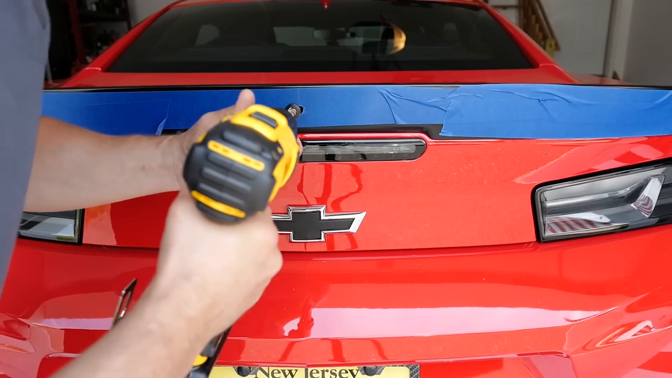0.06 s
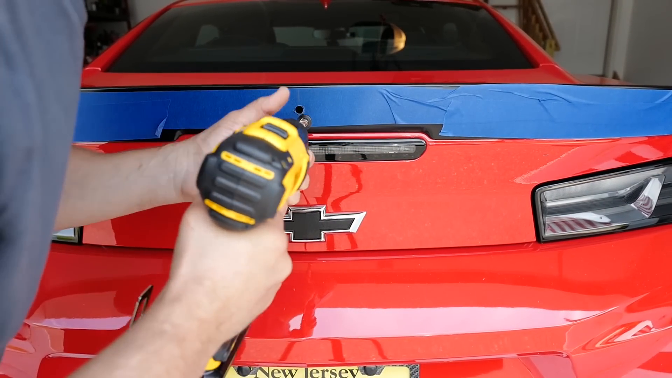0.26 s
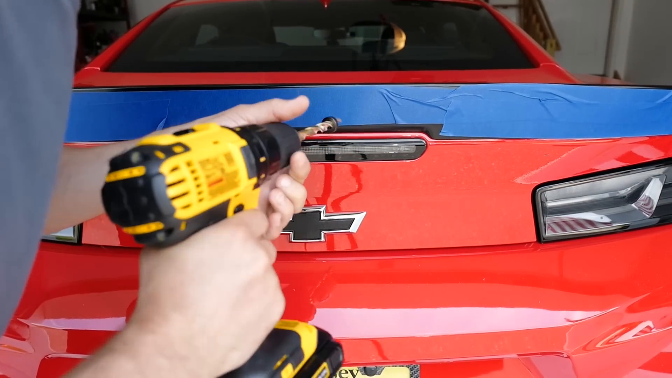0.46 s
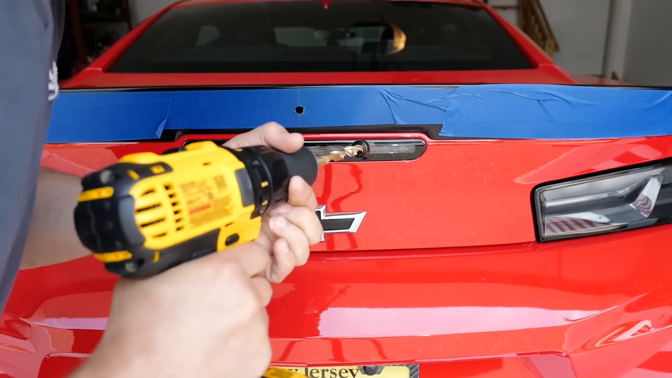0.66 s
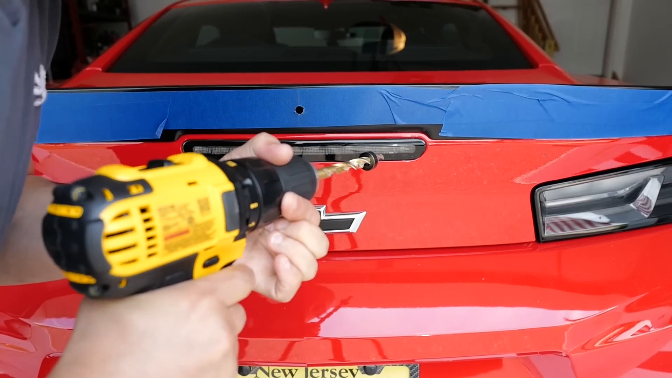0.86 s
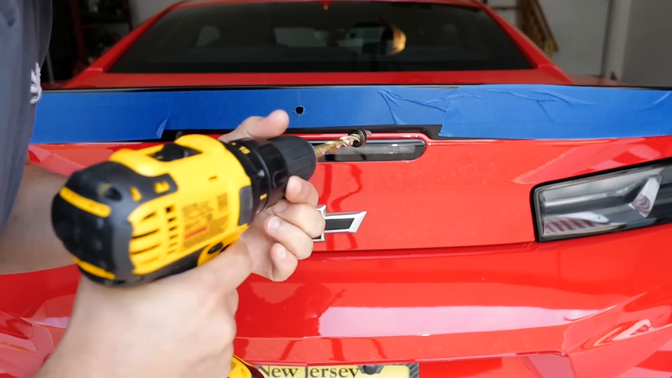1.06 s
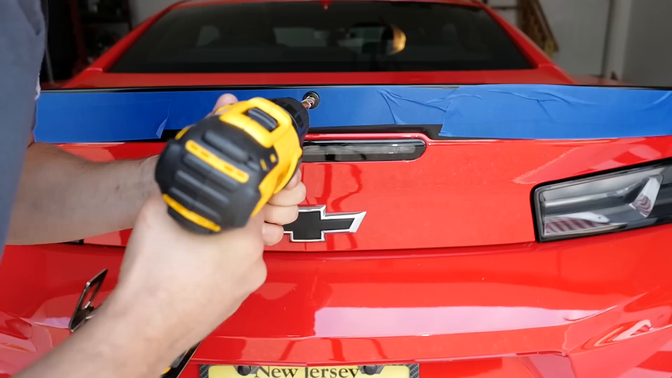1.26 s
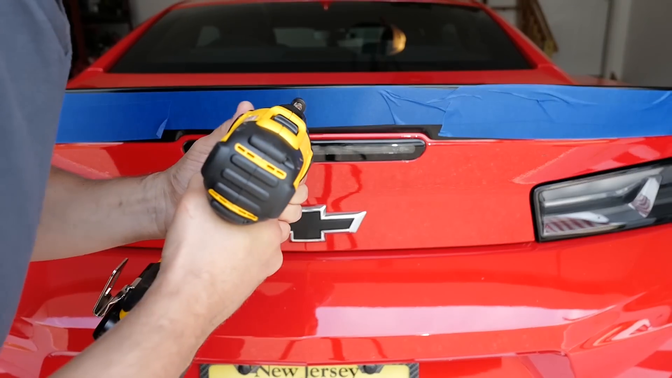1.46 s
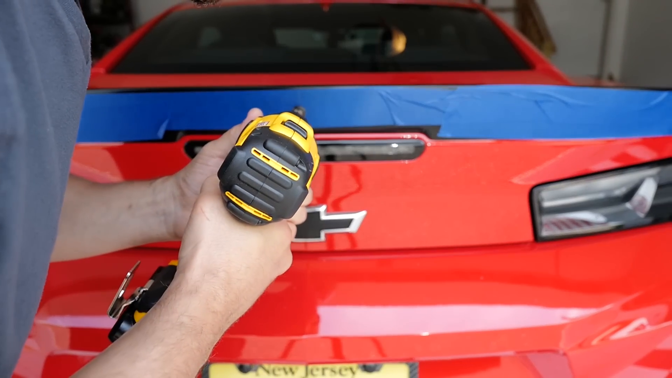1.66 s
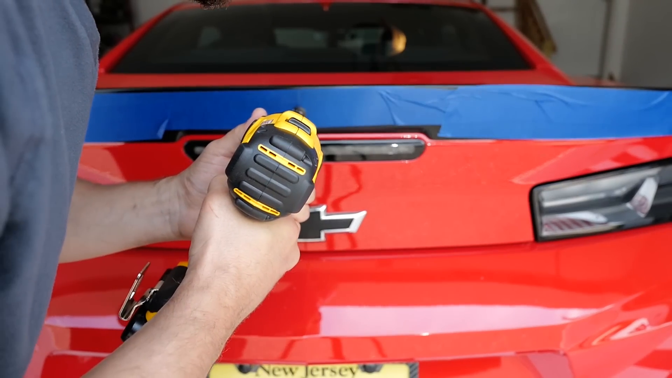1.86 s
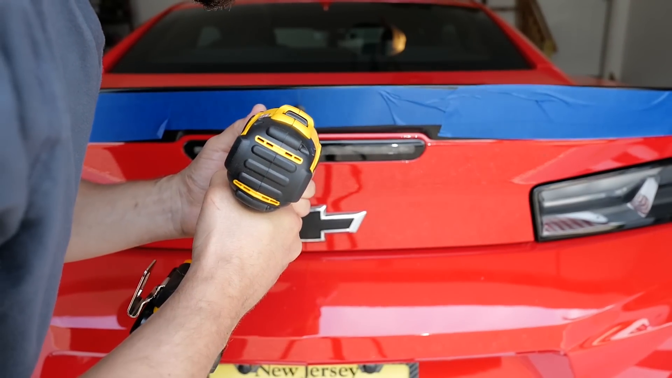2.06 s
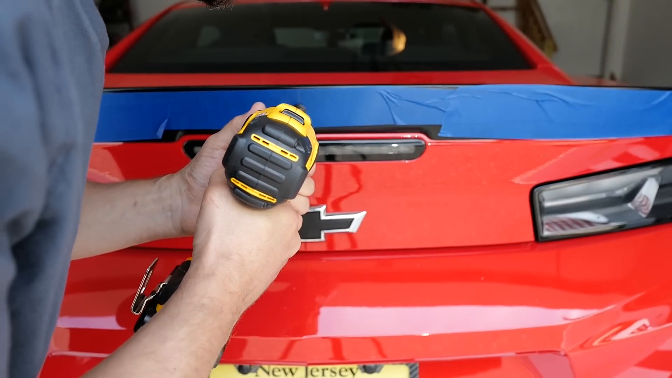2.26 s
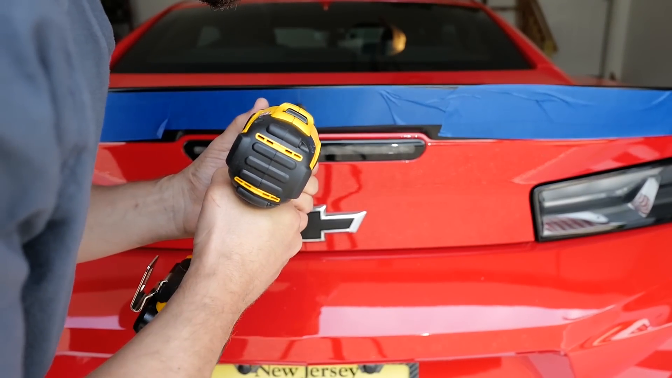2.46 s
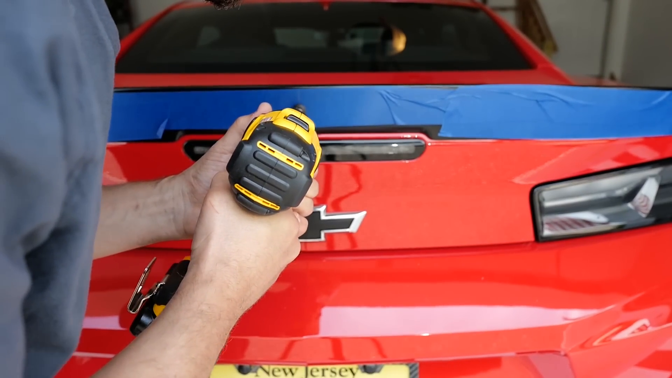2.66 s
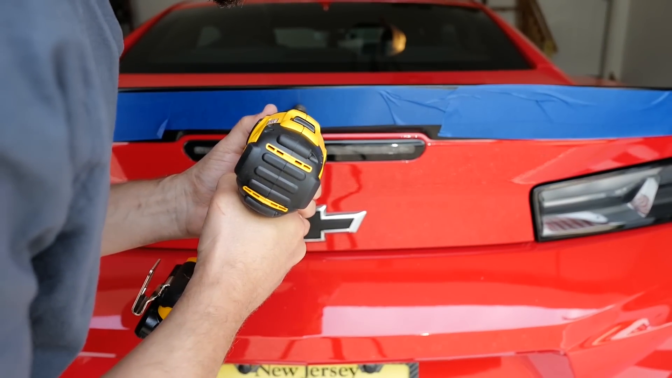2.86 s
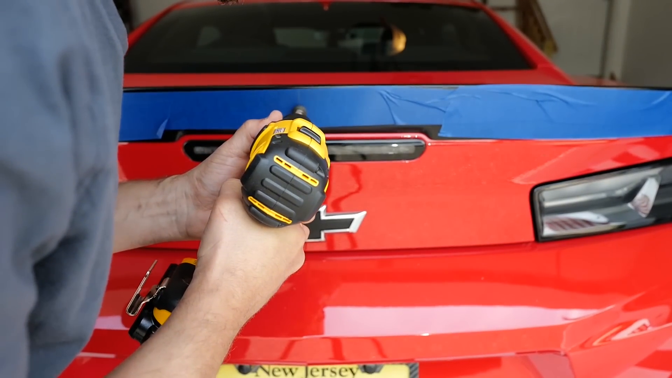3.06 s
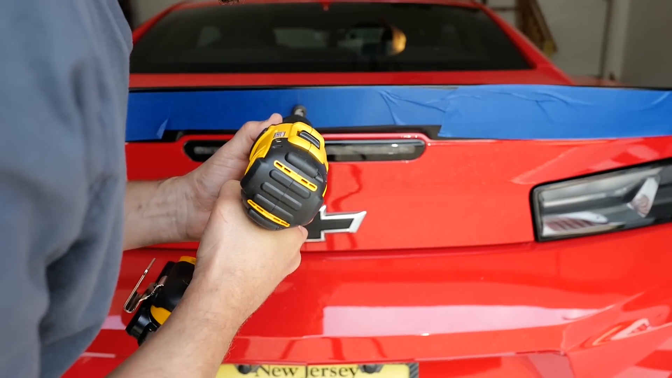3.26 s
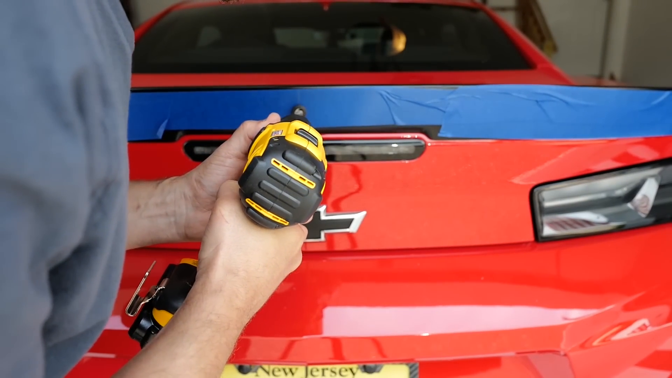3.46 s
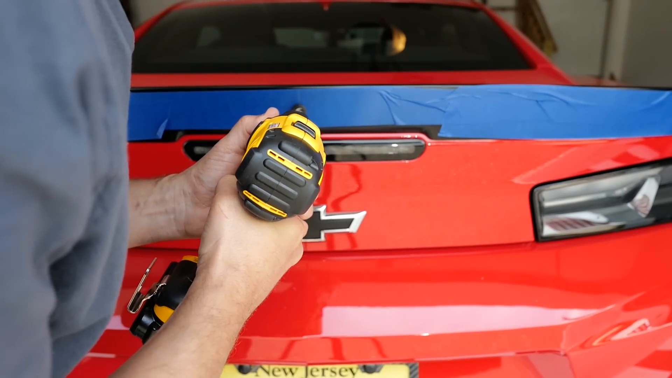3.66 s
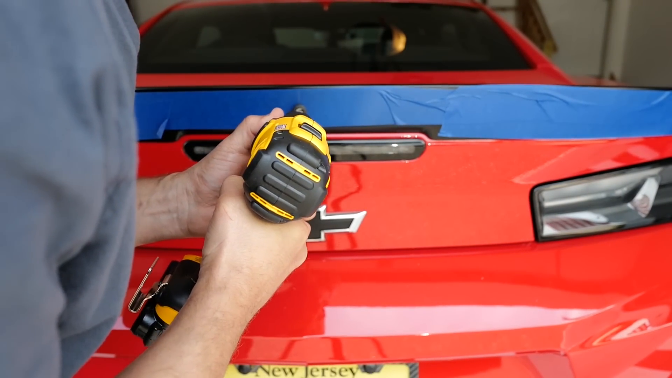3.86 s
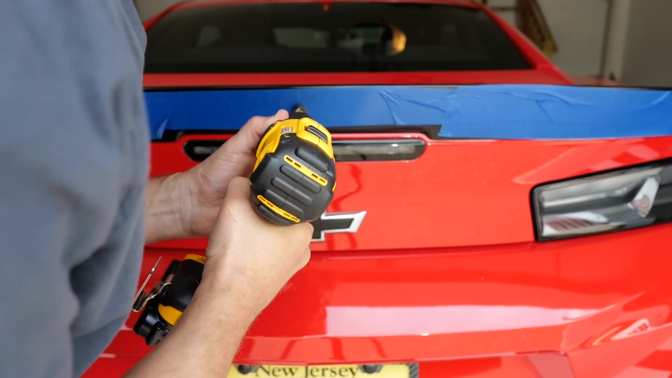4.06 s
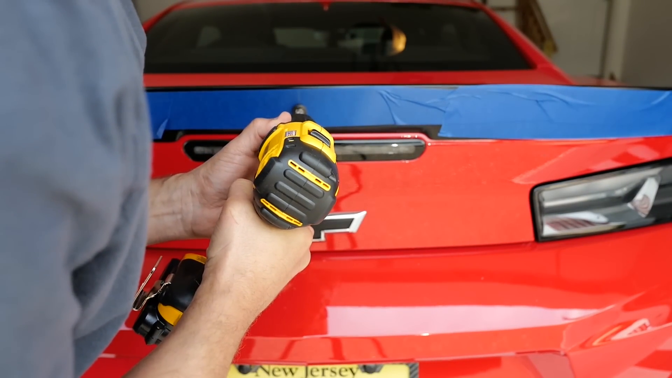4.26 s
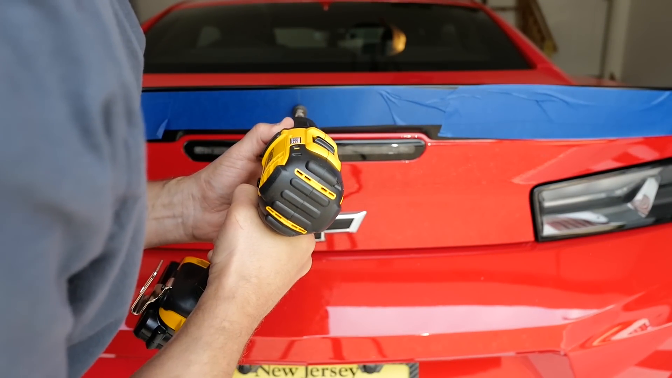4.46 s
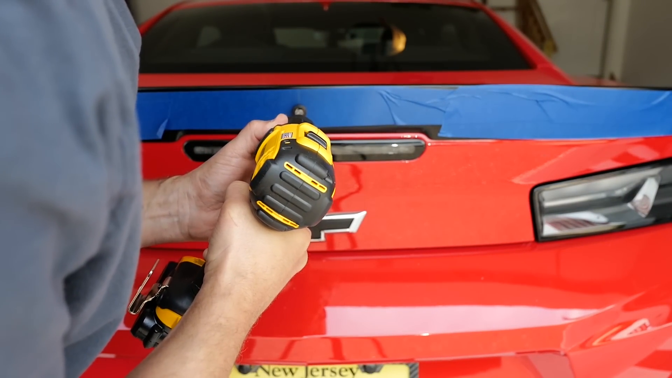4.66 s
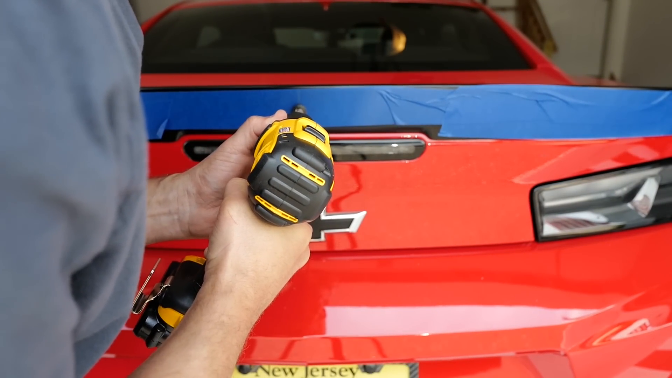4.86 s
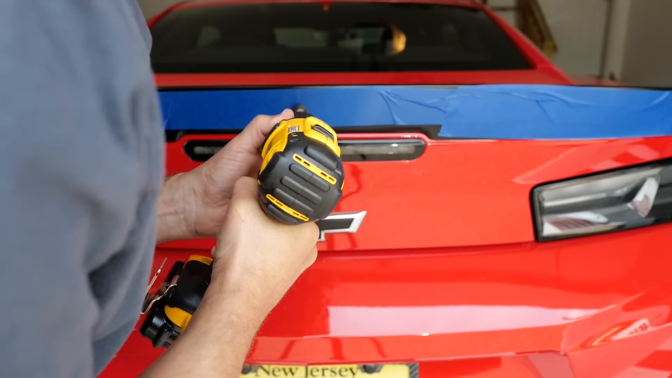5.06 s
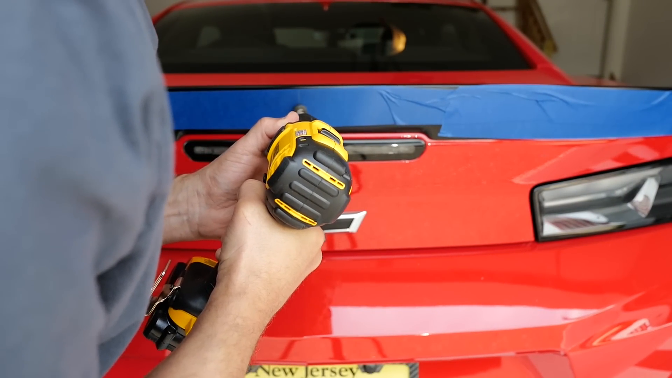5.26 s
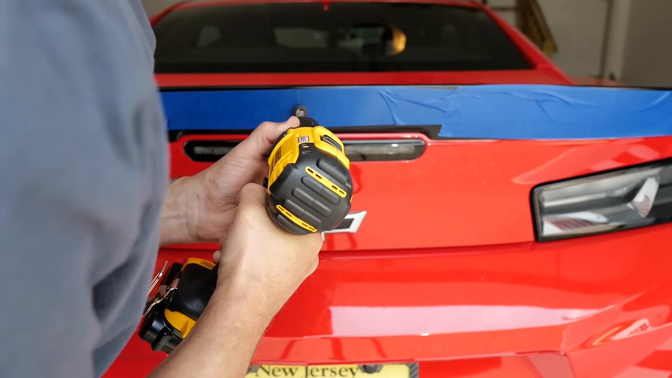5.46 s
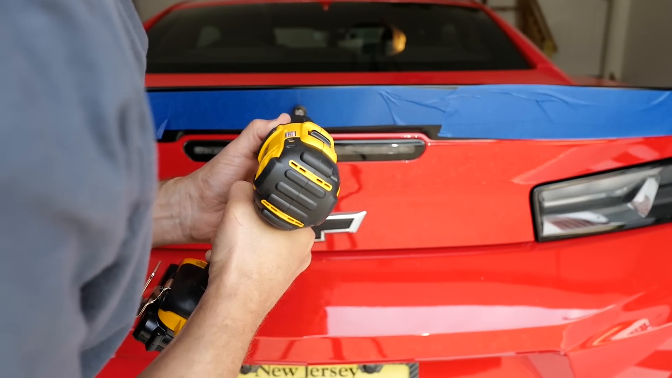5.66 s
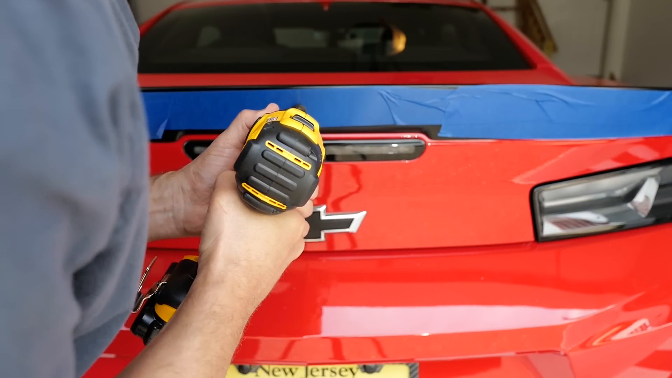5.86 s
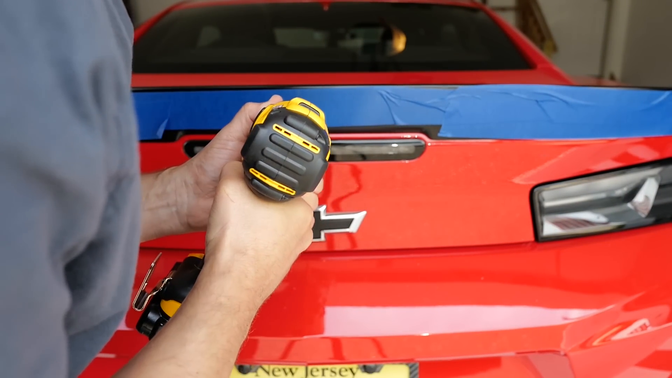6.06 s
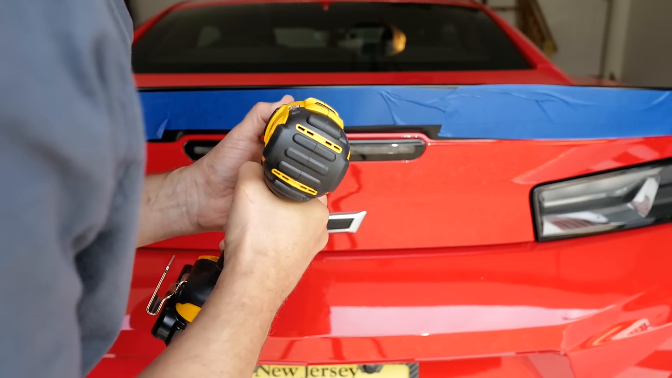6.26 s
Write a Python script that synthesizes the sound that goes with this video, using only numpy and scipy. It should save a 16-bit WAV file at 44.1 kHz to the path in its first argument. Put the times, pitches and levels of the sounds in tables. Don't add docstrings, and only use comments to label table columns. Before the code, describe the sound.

A faint steel squeak and skin rustling open the scene, followed by a sharp knock and a cluster of chuck rattles. Light scraping on sheet metal leads to a buzzy electronic trigger whine and a rapid motor rise. The bright, gritty drill whirr drops and roughens twice under load, springing back to full speed each time. Heard close in a small hard-walled garage, on a thin-sounding camera microphone with two ports.

```python
import sys
import numpy as np
from scipy import signal
from scipy.fft import rfft, irfft, next_fast_len
from scipy.io import wavfile
from scipy.ndimage import uniform_filter1d

SR = 44100
rng = np.random.default_rng(int(sys.argv[2]) if len(sys.argv) > 2 else 0)


def generate_wav(signal):
    frames = np.transpose(np.atleast_2d(signal))
    scaled = np.clip(frames, -1, 1) * 32767
    pcm = np.round(scaled).astype(np.int16)
    wavfile.write(sys.argv[1], SR, pcm)


def gain_from_db(level_db):
    decades = np.asarray(level_db, float) / 20
    return 10 ** decades


N = 278271
T = np.arange(N) / SR

# f/Hz, level per Hz/dB
GARAGE = [(18, -71), (30, -26.5), (198, -11), (293, -15.5), (380, -17.5), (430, -27.5), (578, -24.5),
          (751, -23.5), (1340, -28), (1690, -30), (2780, -34), (3300, -36.5), (8000, -42), (15700, -47)]
# f/Hz, width/Hz, level/dB
HUM_MODES = [(114.7, 13, -67), (166.5, 3.3, -61.5), (205.3, 9, -57.5), (232.7, 8.7, -63.5)]
GARAGE_DB = -53

# dull rub level/dB, chuck rasp level/dB, skin hiss level/dB, graininess/dB
GRIP, CHUCK, PALM, STEEL, LID = (-0.5, -7, -16, 0.5), (1, 1.5, -23, 3.5), (-9, -13, -1, 1.5), (-12, 0, -16, 4), (0.5, -26, -19.5, 5.5)
# loudest t/s, swell/s, fade/s, level/dB, surface
STROKES = [(.05, .2, .3, -62, STEEL), (.4, 0.12, .09, -66, PALM), (.615, 0.12, 0.047, -52.5, PALM),
           (.66, .1, .14, -64, GRIP), (.79, 0.088, 0.033, -49, STEEL), (.88, .2, .1, -65, GRIP),
           (1.045, 0.17, 0.097, -44.5, CHUCK), (1.165, 0.073, .05, -54.5, GRIP),
           (1.17, .06, .045, -54, PALM), (1.3, 0.26, 0.5, -55.5, GRIP), (2.04, 0.085, 0.23, -52, LID),
           (2.142, 0.045, 0.088, -43, LID), (2.24, .2, 0.047, -53.5, LID)]
# rub level/dB, rasp level/dB, hiss level/dB
RESTING = (-86, -88, -78)
STROKE_DROP_DB, STROKE_CURVE = 22.5, 1.4
# f/Hz, width/Hz, level/dB
BODY_MODES = [(714, 95, -9), (880, 100, 7), (980, 96, -13), (1390, 400, 2), (1890, 260, 0), (2230, 112, 2),
              (2810, 60, -3)]
# f/Hz, width/Hz, level/dB
CHUCK_MODES = [(3250, 60, -1), (3660, 96, -8), (3820, 72, -4), (4190, 400, 1), (4660, 110, -1),
               (5050, 130, -10), (5530, 160, -5)]
# f/Hz, width/Hz, level/dB
LID_MODES = [(380, 66, -5), (720, 53, -1), (1030, 160, -0.5), (1590, 50, -13), (1946, 75, -0.5),
             (2190, 80, -11), (2830, 50, -17)]
ON_LID_S, TRIGGER_S = 1.97, 2.3

# t/s, peak level/dB, ring f/Hz, crack minus peak level/dB
KNOCKS = [(.036, -37, 3520, -14), (0.536, -43, 1450, -13), (.675, -43, 853, -16), (.712, -41, 4300, -11),
          (.718, -43, 2500, -9), (0.7693, -20.5, 880, -15), (.92, -42, 1250, -10), (0.951, -34, 1996, -15),
          (0.965, -40, 1190, -6), (.978, -39, 1850, -8.5), (0.995, -31, 1220, -21), (1.017, -32, 1330, -19),
          (1.026, -32, 1020, -18), (1.046, -30, 2240, -21), (1.075, -35, 1260, -14), (1.123, -37, 917, -6),
          (1.389, -37.5, 1350, -20), (1.554, -43.5, 830, -25), (2.003, -38.5, 940, -25),
          (2.124, -37.5, 990, -22), (2.144, -47, 2010, -14), (2.226, -41, 931, -22), (2.298, -39, 8100, -8)]
# t/s, peak level/dB, ring f/Hz, crack minus peak level/dB
BUMPS = [
    (.144, -46, 790, -29),
    (.722, -33, 1500, -9),
    (0.762, -35, 4600, -20),
    (.784, -40, 2550, -13),
    (1.142, -34.5, 5530, -1),
    (1.143, -29, 1850, -15),
    (1.202, -40, 3800, -5),
]
KNOCK_RISE_S, BUMP_RISE_S = 0.00042, 0.0032
RING_S, RING_SLOPE = 0.0078, .0012

# t/s, level/dB
SQUEAK = [
    (0, -64),
    (.05, -70),
    (.1, -74),
    (.14, -65),
    (.2, -69),
    (.27, -70),
    (.31, -85),
]
# f/Hz, width/Hz, level/dB
SQUEAK_MODES = [(3190, 150, -5), (3570, 150, -5), (3910, 70, 7), (4580, 200, -10)]

# t/s, level/dB
CHOPPER = [
    (2.296, -85),
    (2.298, -40.5),
    (2.325, -35.5),
    (2.35, -39),
    (2.39, -31),
    (2.42, -80),
]
# f/Hz, level/dB
CHOPPER_TONES = [(3935, -4.5), (7880, -3), (11800, -12), (15720, -19)]

# t/s, speed the shaft heads for f/Hz, lag/s
DRIVE = [(2.27, 1469, 1.26), (2.388, 941, .357), (2.481, 411.2, .078), (2.85, 410, .1), (3.28, 407.2, .02),
         (3.34, 409.3, .2), (3.464, 301.3, .231), (4.063, 317, .288), (4.126, 406.2, .075),
         (4.544, 266.2, .296), (5.179, 292, .136), (5.261, 406.5, .084), (5.5, 405.8, .1), (6.0, 404.8, .2)]
FREE_HZ, BOGGED_HZ = 400, 335
RUN_IN_S = 2.52
SURGE_HZ_PER_S, SURGE_S = 500, .025
SURGE_GRIND_DB, SURGE_BARS_DB, SURGE_AIR_DB = 3, 1, 1

FAN_BLADES, BARS = 19, 10
# shaft f/Hz, level/dB
FAN_VOICE = [(100, -49), (170, -25.5), (285, -25.5), (322, -31.5), (345, -23), (363, -33.5), (385, -22),
             (410, -23.5)]
# shaft f/Hz, level/dB
BARS_VOICE = [(100, -70), (205, -23.5), (252, -18.5), (272, -40), (338, -42), (350, -34), (380, -27.5),
              (410, -30)]
# t/s, change of fan tone level/dB, change of brush tone level/dB
TONE_SWELLS = [(2.47, 0.5, 2), (2.52, -9, 9.5), (2.58, 2.5, -4), (2.75, -0.5, -4.5), (3.0, 1.5, -0.5),
               (3.2, 3, -2.5), (3.55, -0.5, 0), (3.9, -5, 3), (4.2, 0, 1), (4.45, 0.5, -4.5), (4.6, -3, 1.5),
               (5.0, 1.5, -2), (5.33, 1, -1), (5.4, -2.5, 1.5), (5.65, -1.5, 0.5), (6.0, -5.5, 1.5),
               (6.15, -2, 1.5), (6.3, 2, 3.5)]
ROTOR_ORDERS = [4, 6, 7, 8, 9, 11, 12, 13, 14, 16, 17, 18, 20, 21, 22, 24, 26, 28, 29, 30, 31, 33, 36, 40]
# running free level/dB, bogged down level/dB
ROTOR = [(-41, -44), (-47, -43), (-44, -40), (-42, -40), (-40, -44), (-43, -38.5), (-39, -38.5), (-41, -48),
         (-38, -47), (-39, -40), (-42, -39), (-37, -44), (-37, -37), (-36, -43), (-45, -47), (-44, -49),
         (-46, -49), (-45, -48), (-44, -47), (-38, -43), (-50, -45), (-51, -46), (-47, -48), (-50, -40)]
# f/Hz, level/dB
UNBALANCE = [(200, -69), (260, -44), (290, -44), (325, -45.5), (365, -47.5), (405, -43), (480, -52),
             (570, -52), (700, -46.5), (800, -55), (900, -57.5), (1100, -47), (1230, -46)]
# f/Hz, level per Hz/dB
SHELL = [(90, -27), (250, -14), (400, -9.5), (530, -24.5), (750, -12), (1100, -7), (1700, -4), (3300, -3.5),
         (6000, -0.5), (7000, -0.5), (9500, -2), (11000, -5), (14000, -4.5), (16000, -9)]
# f/Hz, width/Hz, level/dB
SHELL_MODES = [(1316, 170, 4), (2060, 480, 5.5), (2800, 200, 4), (3530, 400, 2.5), (4760, 250, 0.5),
               (6600, 1040, -5), (8460, 2800, 2.5), (10600, 980, -0.5), (12000, 1100, 3)]
MESH, GEARING = 7.2, 24.8
GRIND_DB, GRIND_FROM_HZ, GRIND_RISE_DB = -28.5, 220, 27
AIR_FROM_HZ = 7100
AIR_DB, AIR_RISE_DB = 1, 31.5

# f/Hz, level/dB
WALLS = [(30, 4), (150, 7), (300, -5.5), (600, -0.5), (1200, -1.5), (2500, -4), (5000, 3), (8000, -1.5),
         (15000, 3.5)]
ROOM_T60_S, ROOM_DB = 0.13, -13.5
# f/Hz, left minus right level/dB
LEFT_MINUS_RIGHT = [(60, 0.0), (110, -1), (200, 3.5), (380, -2.5), (700, -1), (1290, -1.5), (2380, 2),
                    (4400, 1.5), (8120, 2), (15000, -2)]
# f/Hz, level/dB
MIC = [(20, -17), (50, -14), (80, -2), (430, -1), (510, -8.5), (600, -0.5), (16000, -0.5)]


def level(x, db=0):
    return x * gain_from_db(db) / np.sqrt(np.mean(x ** 2))


def shape(table, hz):
    f, db = np.transpose(table)
    return np.interp(np.log(np.maximum(hz, 1)), np.log(f), db)


def colour(x, gain):
    size = next_fast_len(N)
    return irfft(rfft(x, size) * gain(np.fft.rfftfreq(size, 1 / SR)), size)[:N]


def peak(f, hz, width):
    return 1 / (1 + (2 * (f - hz) / width) ** 2)


def band(lo_hz, hi_hz, x=None):
    x = rng.standard_normal(N) if x is None else x
    return level(colour(x, lambda f: 1 / (1 + (lo_hz / (f + 1)) ** 4) / (1 + (f / hi_hz) ** 4)))


def ring(x, modes):
    return level(colour(x, lambda f: sum(gain_from_db(db) * peak(f, hz, width) for hz, width, db in modes)))


def walk(rate):
    steps = np.repeat(rng.standard_normal(int(rate * T[-1]) + 2), repeats=8)
    steps = level(uniform_filter1d(uniform_filter1d(steps, size=8), size=8))
    return np.interp(T * rate * 8, np.arange(len(steps)), steps)


def curves(table):
    s, *columns = np.transpose(table)
    return [np.interp(T, s, c) for c in columns]


def garage():
    mid, side = rng.standard_normal((2, N))

    def side_gain(f):
        return gain_from_db(shape(GARAGE, f)) * (np.clip(f / 900, .22, .85) + .15 * (f < 70))

    common = colour(mid, lambda f: gain_from_db(shape(GARAGE, f)))
    scale = gain_from_db(GARAGE_DB - 3.5) / common.std()
    common = common * scale * gain_from_db(1.0 * walk(3.5))
    differing = colour(side, side_gain) * scale
    hum = 0
    for hz, width, db in HUM_MODES:
        hum = hum + level(colour(rng.standard_normal(N), lambda f: peak(f, hz, width)), db)
    return common + hum + differing * np.array([[1], [-1]])


def strokes():
    t = np.arange(0, TRIGGER_S, .001)
    power, grain = gain_from_db(np.outer(RESTING, np.ones(len(t)))) ** 2, 0
    for s, swell, fade, db, (*mix_db, grain_db) in STROKES:
        distance = np.where(t < s, (s - t) / swell, (t - s) / fade)
        shape_db = db - STROKE_DROP_DB * distance ** STROKE_CURVE
        power = power + gain_from_db(np.add.outer(mix_db, shape_db)) ** 2
        grain = grain + grain_db * gain_from_db(shape_db + max(mix_db)) ** 2
    return curves(np.transpose([t, *(10 * np.log10(power)), grain / power.max(axis=0)]))


def hands():
    dull_db, rasp_db, hiss_db, grain_db = strokes()
    grains = gain_from_db(grain_db * np.clip(walk(500), -2, 1.6) - 0.15 * grain_db ** 2)
    slip = rng.standard_normal(N) * grains
    on_body = ring(slip, BODY_MODES) + 0.57 * band(620, 3000, slip)
    dull = np.where(T < ON_LID_S, on_body, ring(slip, LID_MODES)) * gain_from_db(dull_db - 3)
    rasp = (ring(slip, CHUCK_MODES) + 0.77 * band(3400, 7500, slip)) * gain_from_db(rasp_db - 8.5)
    hiss = band(6200, 13000, slip) * gain_from_db(hiss_db)
    return (dull + rasp + hiss) * (T < TRIGGER_S)


def knocks():
    out, t = np.zeros(N), T[:SR // 8]
    thud, crack = band(390, 2640), band(2200, 10000)
    hits = [(*k, KNOCK_RISE_S) for k in KNOCKS] + [(*k, BUMP_RISE_S) for k in BUMPS]
    for s, peak_db, hz, crack_db, rise in hits:
        i = int(s * SR)
        here = slice(i, i + len(t))
        t60 = RING_S - RING_SLOPE * crack_db
        after = np.maximum(t - rise, 0)
        tone = 0.51 * np.sin(2 * np.pi * hz * t)
        tone += .15 * (hz < 3000) * np.sin(2 * np.pi * 2.0 * hz * t)
        hit = (tone + 0.3 * thud[here]) * np.exp(-np.log(1000) * after / t60)
        hit += gain_from_db(crack_db) * crack[here] * np.exp(-after / 0.0021)
        out[here] += gain_from_db(peak_db) * hit * np.minimum(t / rise, 1)
    return colour(out, lambda f: 1 / (1 + (520 / (f + 1)) ** 6))


def bit():
    sing = ring(rng.standard_normal(N), SQUEAK_MODES)
    return sing * gain_from_db(curves(SQUEAK)[0] + 4 + 3 * walk(40)) * (T < SQUEAK[-1][0])


def chopper():
    whine = sum(gain_from_db(db + 4.6 * walk(99)) * np.sin(2 * np.pi * hz * T) for hz, db in CHOPPER_TONES)
    return whine * gain_from_db(curves(CHOPPER)[0]) * (T > CHOPPER[0][0]) * (T < CHOPPER[-1][0])


def shaft():
    start, goal, lag = np.transpose(DRIVE)
    row = np.maximum(np.searchsorted(start, T) - 1, 0)
    lapse = np.cumsum((T > start[0]) / lag[row]) / SR
    hz = np.exp(-lapse) * np.cumsum(np.diff(np.exp(lapse), prepend=1) * goal[row])
    surge = np.clip(np.gradient(hz) * SR / SURGE_HZ_PER_S, 0, 1)
    smooth = 1 / (SURGE_S * SR)
    return np.maximum(hz, 1), signal.lfilter([smooth], [1, smooth - 1], surge)


def shell_db(hz):
    return shape(SHELL, hz) + sum(db * peak(hz, f, width) for f, width, db in SHELL_MODES)


def shell_at(hz):
    grid = np.arange(0, SR / 2, 20)
    return np.interp(hz, grid, shell_db(grid))


def motor_tones(hz, turn, surge, load, fan_swell_db, brush_swell_db, grind_db):
    spin_up = T < RUN_IN_S

    def tone(multiple, db, waver_db, rate):
        wave = np.sin(multiple * turn + 7 * rng.random()) * (multiple * hz < .4 * SR)
        return np.sqrt(2) * gain_from_db(db + waver_db * walk(rate)) * wave

    fan_db = shape(FAN_VOICE, hz) + fan_swell_db
    bars_db = shape(BARS_VOICE, hz) + brush_swell_db + SURGE_BARS_DB * surge * (T > RUN_IN_S)
    tones = tone(FAN_BLADES, fan_db - .4 * spin_up, 0.68 + 0.91 * load + 1.6 * spin_up, 90)
    tones += tone(BARS, bars_db, 0.53 + 3.1 * load, 70)
    octave_db = -38.0 + 0.13 * (fan_db + 25) + 30 * np.log10(hz / 400) - 3 * load
    tones += tone(2 * FAN_BLADES, octave_db, 3.2 + 2.5 * load, 30)
    for k, (free, bogged) in zip(ROTOR_ORDERS, ROTOR):
        rotor_db = free + load * (bogged - free) + shell_at(k * hz)
        tones += tone(k, rotor_db + grind_db + 26.5 - 5 * spin_up, 2.75, 12)
    for k in (1, 2, 3):
        wobble_db = shape(UNBALANCE, k * hz) + 60 * np.log10(np.minimum(hz / 280, 1))
        tones += tone(k, wobble_db, 2.33, 30)
    return tones


def grind_and_air(hz, turn, surge, fan_swell_db, grind_db):
    air_db = AIR_DB + AIR_RISE_DB * np.log10(np.maximum(hz, 280) / FREE_HZ)
    air_db += SURGE_AIR_DB * surge - .3 * fan_swell_db + 18 * np.log10(np.minimum(hz / 230, 1))
    throb = (1 + 0.11 * np.sin(turn)) * (1 + 0.019 * np.sin(turn / GEARING))
    noise = rng.standard_normal(N) * throb

    def low(f):
        return 1 / (1 + (f / AIR_FROM_HZ) ** 8)

    grind = level(colour(noise, lambda f: gain_from_db(shell_db(f)) * low(f)), 0.93)
    air = level(colour(noise, lambda f: gain_from_db(shell_db(f)) * (1 - low(f))), 1.85)
    grind = grind * gain_from_db(grind_db + 0.72 * walk(18) + 0.33 * walk(120))
    return grind + air * gain_from_db(grind_db + air_db + 0.23 * walk(17))


def gear_chatter(hz, turn, load, grind_db):
    chatter = band(1, 220) * np.sin(MESH * turn) * (1 + 0.18 * np.sin(turn / GEARING + 0.98))
    case_db = 6.4 * peak(MESH * hz, 2070, 260)
    return chatter * gain_from_db(grind_db - 16.5 + 1.5 * load + case_db + shell_at(MESH * hz) + 1.5 * walk(60))


def drill():
    hz, surge = shaft()
    turn = 2 * np.pi * np.cumsum(hz * (1 + 0.00112 * walk(60))) / SR
    load = np.clip((FREE_HZ - hz) / (FREE_HZ - BOGGED_HZ), 0, 1)
    fan_swell_db, brush_swell_db = curves(TONE_SWELLS)
    grind_db = GRIND_DB + GRIND_RISE_DB * np.log10(np.minimum(hz / GRIND_FROM_HZ, 1))
    grind_db += SURGE_GRIND_DB * surge
    sound = motor_tones(hz, turn, surge, load, fan_swell_db, brush_swell_db, grind_db)
    sound += grind_and_air(hz, turn, surge, fan_swell_db, grind_db)
    sound += gear_chatter(hz, turn, load, grind_db)
    return sound * np.clip((T - TRIGGER_S) / 0.063, 0, 1)


def scene():
    near = hands() + knocks() + bit() + chopper() + drill()
    t = T[:SR // 3]
    fade = np.exp(-np.log(1000) * t / ROOM_T60_S) * (t > .004)
    echoes = rng.standard_normal((2, len(t))) * fade
    echoes = echoes / np.linalg.norm(echoes[0])
    off_walls = colour(near, lambda f: gain_from_db(shape(WALLS, f)))
    wet = signal.fftconvolve(off_walls[None], echoes, axes=1)[:, :N]
    direct = [colour(near, lambda f: gain_from_db(sign * shape(LEFT_MINUS_RIGHT, f) / 2)) for sign in (1, -1)]
    duck_db = -3.0 * np.clip((T - TRIGGER_S) / 0.36, 0, 1)
    return np.array(direct) + gain_from_db(ROOM_DB) * wet + garage() * gain_from_db(duck_db)


def roll_off(x):
    return signal.sosfilt(signal.butter(12, 15820, fs=SR, output="sos"), x)


def record(dry):
    heard = np.array([colour(port, lambda f: gain_from_db(shape(MIC, f))) for port in dry])
    return roll_off(heard)


dry = scene()
out = record(dry)
generate_wav(out)
```